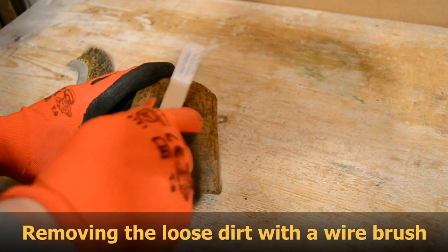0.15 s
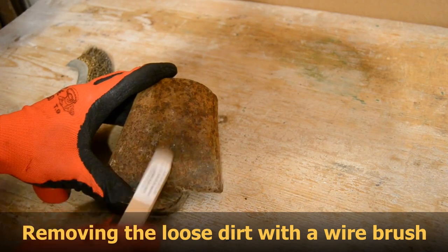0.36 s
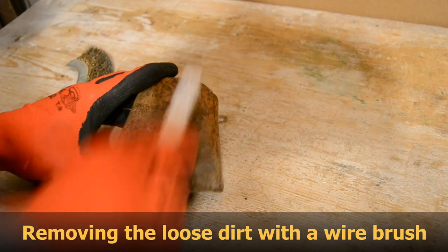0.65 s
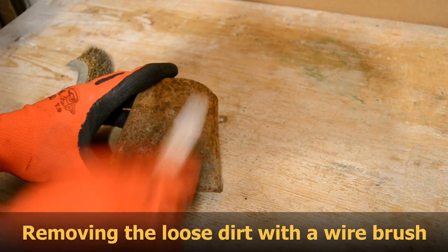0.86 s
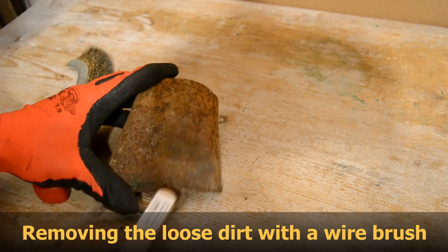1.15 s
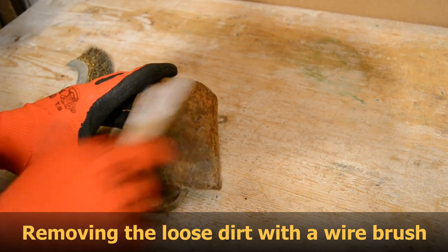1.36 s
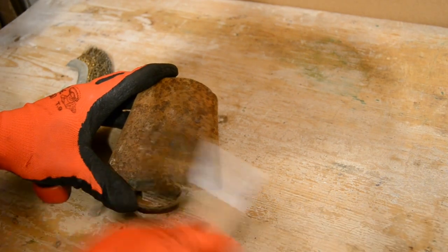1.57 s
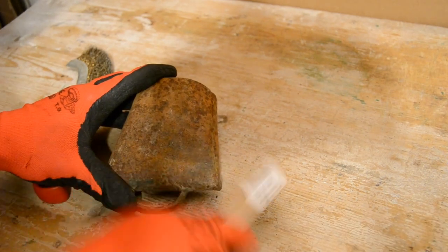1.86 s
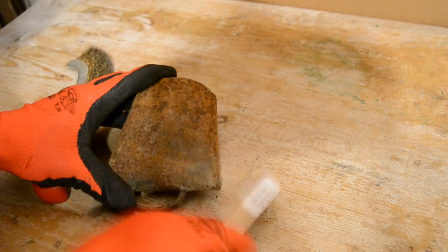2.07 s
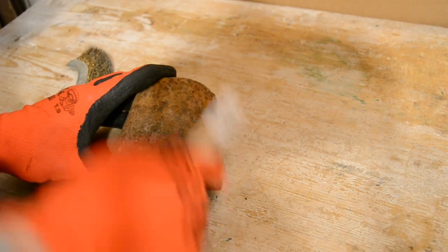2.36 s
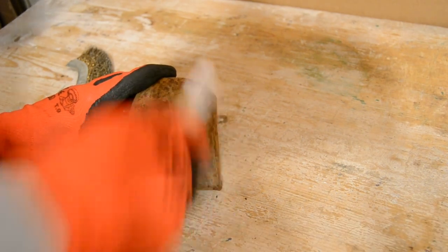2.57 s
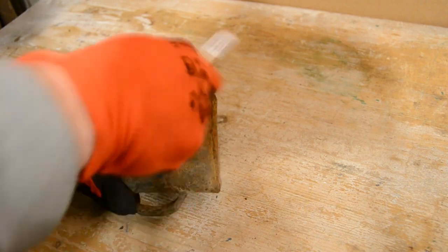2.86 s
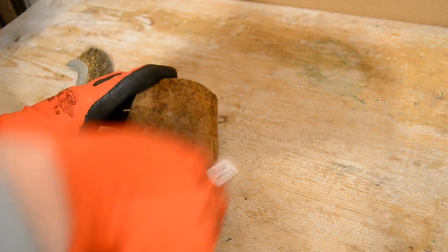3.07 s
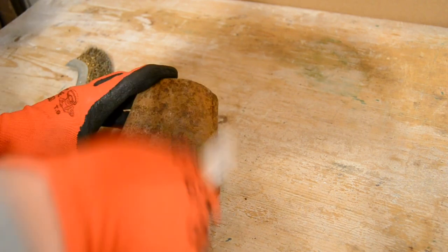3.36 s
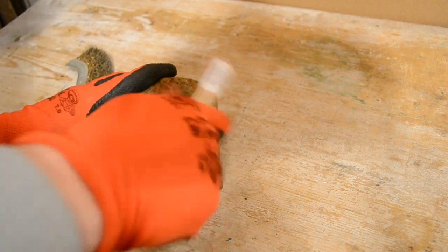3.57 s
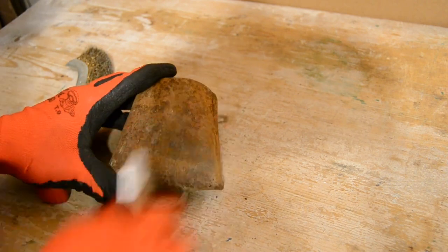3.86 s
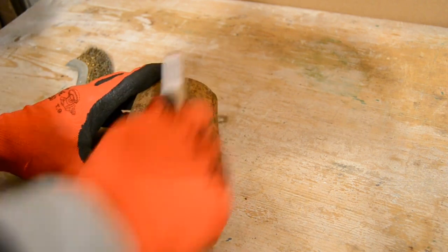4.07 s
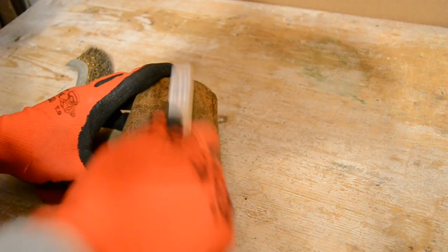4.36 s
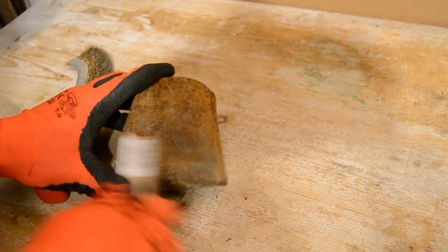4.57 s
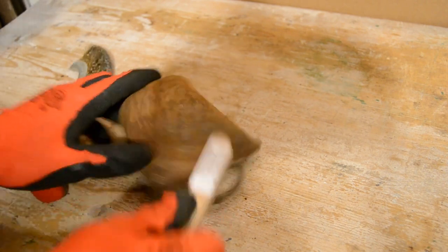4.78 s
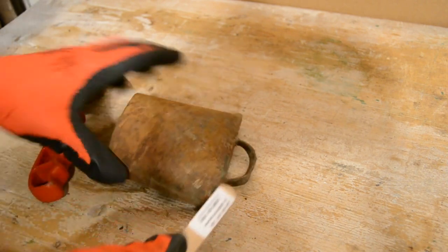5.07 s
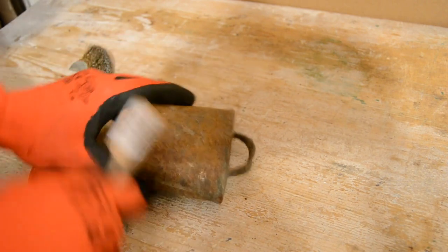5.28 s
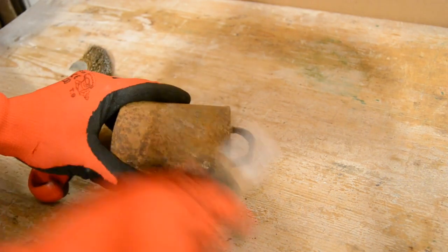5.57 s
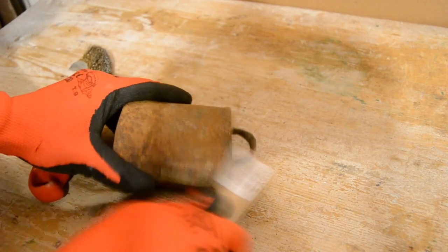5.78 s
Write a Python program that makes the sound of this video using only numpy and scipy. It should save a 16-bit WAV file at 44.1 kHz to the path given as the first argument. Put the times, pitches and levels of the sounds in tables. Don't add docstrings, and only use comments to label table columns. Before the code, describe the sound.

Coarse bristles strike and drag across damped sheet metal, bright and scratchy over a boxy hollow knock and faint wooden bench thuds. Four spaced strokes lead to quicker, lighter ones, then heavier regular scrapes. After a pause for handling and bumping the bell on the bench, brushing resumes with two bright rasps. Short dull room tail, soft steady hiss and hum, close single microphone, centred.

```python
import sys
import numpy as np
from scipy import signal
from scipy.fft import rfft, irfft
from scipy.io import wavfile
from scipy.ndimage import uniform_filter1d

SR = 44100
rng = np.random.default_rng(int(sys.argv[2]) if len(sys.argv) > 2 else 0)


def attenuation_scalar(level_db):
    decades = np.asarray(level_db, float) / 20
    return 10 ** decades


def dump_mix(stems):
    frames = np.atleast_2d(stems).T
    limited = np.clip(frames, -1, 1)
    pcm = np.round(limited * 32767).astype(np.int16)
    wavfile.write(sys.argv[1], SR, pcm)


N = 261513
STEP = 32

# start_s, low_wall_db, high_wall_db, hollow_db, bench_db
LANDINGS = [(0.243, -30.5, -25, -25, -35.5), (0.658, -21, -23, -12.5, -32),
            (1.033, -23.5, -24.5, -23.5, -34.5), (1.418, -32.5, -22, -24, -39.5),
            (1.518, -27, -35, -41, -57), (1.787, -26, -32.5, -47, -42), (2.031, -30.5, -29, -32.5, -40),
            (2.244, -29.5, -28, -33, -37.5), (2.57, -16.5, -24.5, -20, -33),
            (2.944, -18, -23.5, -20.5, -33), (3.287, -23.5, -23.5, -19.5, -36),
            (3.665, -34, -35.5, -42, -41), (3.715, -30.5, -47, -49, -46),
            (4.098, -21.5, -21.5, -31.5, -39.5), (4.472, -28, -29, -18.5, -29),
            (5.442, -16.5, -20, -15.5, -29), (5.729, -22.5, -30.5, -17.5, -29.5)]


def unit(x):
    return x / np.sqrt(np.mean(x ** 2))


def colour(x, points):
    hz, db = np.transpose(points)
    grid = np.linspace(1, SR / 2, 2049)
    log_gain = np.interp(np.log(grid), np.log(hz), db) * np.log(10) / 20
    cepstrum = irfft(log_gain)
    cepstrum[1:2048] *= 2
    cepstrum[2049:] = 0
    impulse = irfft(np.exp(rfft(cepstrum)))[:2048]
    return signal.fftconvolve(x, impulse)[:N]


def shade(x, points):
    return colour(x, points) / np.std(colour(rng.standard_normal(N), points))


def walk(rate):
    hold = int(SR / rate)
    levels = np.repeat(rng.standard_normal(N // 200), hold)[:N]
    return 1.2 * uniform_filter1d(levels, hold)


def ring(force, modes, wander_db, rate, tilt_db=0):
    out, power = 0, 0
    turned = np.arange(N) > 4.68 * SR
    centre_hz = np.mean(modes, axis=0)[0]
    for k, (hz, width, db, turned_db) in enumerate(modes):
        r = np.exp(-np.pi * width / SR)
        held_db = np.where(turned, turned_db, db)
        drive = force * attenuation_scalar(held_db + tilt_db * np.log2(hz / centre_hz) + wander_db * walk(rate))
        poles = [1, -2 * r * np.cos(2 * np.pi * hz / SR), r * r]
        sign = (-1) ** k
        out = out + sign * (1 - r * r) / 2 * signal.lfilter([1, 0, -1], poles, drive)
        power += attenuation_scalar(db) ** 2 * np.pi * width / SR
    return out / np.sqrt(power)


def shop():
    # pitch_hz, level_db per Hz
    idle = [(25, -12.5), (60, -11), (100, -4), (150, -1.5), (300, -3.5), (700, -5), (1300, -8),
            (2000, -9.5), (3200, -13), (5000, -19.5), (8000, -23.5), (11000, -26.5)]
    return attenuation_scalar(-60.5 + 1.4 * walk(1.7)) * unit(colour(rng.standard_normal(N), idle))


def slips(per_s, spread_db, patchy_db):
    when = rng.random(N) < per_s / SR
    size = np.minimum(rng.exponential(size=N), 4.)
    sign = rng.standard_normal(N)
    return unit(when * sign * attenuation_scalar(spread_db * size + patchy_db * walk(60)))


def swell(start, top, lift, db, rule):
    over_db, rise, sag, release = rule
    top_db = db + over_db
    end_db = top_db - sag * (lift - top)
    times = [start, top, lift, lift + 80 / release]
    levels = [top_db - rise * (top - start), top_db, end_db, end_db - 80]
    return attenuation_scalar(np.interp(np.arange(0, N, STEP) / SR, times, levels, left=-200, right=-200))


def touches(rows, rules):
    total = 0
    for start, top, lift, rustle, weight in rows:
        drives = [rustle] * 3 + [weight] * 2
        total = total + np.array([swell(start, top, lift, db, rule)
                                  for db, rule in zip(drives, rules.values())])
    return total


def knocks():
    # start_s, low_wall_db, high_wall_db
    snag_rows = [(1.177, -23, -47), (1.328, -40.5, -46.5), (1.904, -38, -44.5), (3.624, -52, -59),
                 (3.637, -40.5, -49), (3.903, -27, -44), (4.697, -66, -45), (4.707, -48, -40),
                 (4.733, -34.5, -33.5), (5.135, -56, -56), (5.368, -44.5, -45), (5.419, -48, -40)]
    # start_s, wall_db, hollow_db, bench_db
    bump_rows = [(.05, -61, -59, -51.5), (1.862, -38, -34.5, -47), (2.089, -43, -29.5, -44.5),
                 (2.3, -50, -32.5, -52), (3.03, -37, -32, -44), (3.394, -52, -38, -36.5),
                 (4.759, -32.5, -11.5, -36.5), (4.779, -56, -20.5, -51), (4.799, -58, -46, -64),
                 (4.844, -62, -40, -45), (4.864, -40, -43, -73), (4.944, -76, -32.5, -42),
                 (4.969, -32, -44, -74), (5.029, -44, -55, -61), (5.065, -45, -51, -62),
                 (5.298, -42, -43.5, -60), (5.328, -76, -68, -73)]
    snags = [(s, low, high, low - 18.5, low - 29) for s, low, high in snag_rows]
    bumps = [(s, wall, wall - 15, hollow, bench) for s, wall, hollow, bench in bump_rows]
    return np.vstack([LANDINGS, snags, bumps]).T


def blows(db, rise_s, fall_s):
    t = np.arange(int(.06 * SR)) / SR
    spikes = np.zeros(N)
    spikes[(knocks()[0] * SR).astype(int)] = attenuation_scalar(db)
    return signal.fftconvolve(spikes, (1 - np.exp(-t / rise_s)) * np.exp(-t / fall_s))[:N]


def pressure():
    # start_s, loudest_s, until_s, rustle_db, weight_db
    handling = [(0, -0.01, 0.026, -47, -49.5), (0.036, .062, 0.25, -54, -55),
                (2.47, 2.497, 2.46, -54.5, -74), (1.94, 1.96, 1.94, -64, -51), (2.15, 2.17, 2.3, -69, -60),
                (2.34, 2.36, 2.41, -71, -53.5), (4.67, 4.715, 4.83, -44, -43),
                (4.73, 4.736, 4.752, -42, -38.5), (4.769, 4.77, 4.71, -46, -29),
                (4.842, 4.855, 4.88, -54.5, -43.5), (4.89, 4.9, 4.93, -60, -56),
                (4.94, 4.955, 4.96, -48, -42), (4.994, 5.03, 5.09, -55.5, -52), (5.1, 5.14, 5.1, -66, -51),
                (5.22, 5.25, 5.32, -53, -51.5), (5.365, 5.375, 5.43, -54, -52)]
    # over_db, rise_db_per_s, sag_db_per_s, release_db_per_s
    touch_rules = dict(low=(0, 300, 74, 500.5), high=(-9, 300, 87, 500), back=(-0.5, 302, 45, 493),
                   hollow=(3, 198, 62, 503.5), bench=(-8, 200, 44, 407))
    # fastest_s, lift_s, drag_db, brightness_db, weight_db
    strokes = [(0.353, 0.432, -37, 7.5, -36), (0.749, 0.82, -34.5, 3, -36.5), (1.13, 1.209, -35, 7, -31),
               (1.429, 1.493, -38, 6, -33.5), (1.583, 1.612, -35.5, 2.5, -41.5),
               (1.842, 1.848, -34, 4, -39.5), (2.07, 2.077, -38, 3, -40.5), (2.26, 2.292, -37, 1, -35.5),
               (2.632, 2.723, -36.5, 3.5, -31.5), (2.999, 3.097, -36, 3, -34.5),
               (3.363, 3.445, -36, 2, -33.5), (3.68, 3.708, -47.5, 0, -48), (3.833, 3.879, -35, 6, -36.5),
               (4.221, 4.27, -33, 3, -34), (4.557, 4.62, -34.5, 2.5, -34.5), (5.51, 5.544, -36, 8, -34),
               (5.804, 5.818, -36, 7, -34)]
    # over_db, rise_db_per_s, sag_db_per_s, release_db_per_s
    drag_rules = dict(low=(-0.5, 42, 48, 421), high=(0, 93, 50.5, 534), back=(-8.5, -28.5, 56.5, 392),
                  hollow=(0.5, -38, 92, 332), bench=(-10.5, -39.5, 38, 249))
    back_levels = [0, -1, -0.5, 4, -4.5, -4, 0, 1.5, 2.5, 3, 3, -3, -1, -2, 0.5, 1, 1]
    # start_s, loudest_s, until_s, rake_db, weight_db
    rim_rakes = [
        (1.505, 1.522, 1.576, -45, -69),
        (3.207, 3.211, 3.07, -49.5, -66.5),
        (3.622, 3.638, 3.63, -44.5, -42),
        (3.89, 3.915, 3.922, -33.5, -41.5),
        (4.27, 4.295, 4.305, -34, -51),
    ]
    # over_db, rise_db_per_s, sag_db_per_s, release_db_per_s
    raking_rules = dict(low=(-11, 300, 90, 1100), high=(-10.5, 300, 91, 1100), back=(-0.5, 303, 51, 1102.5),
                    hollow=(0, 300, 60, 900), bench=(-20, 200, 62, 500))

    drags = touches(handling, touch_rules)
    rim = touches(rim_rakes, raking_rules)
    for landing, stroke, back in zip(LANDINGS, strokes, back_levels):
        start = landing[0] + 0.0075
        top, lift, drag, bright, weight = stroke
        drives = drag, drag + bright, drag + back, weight, weight
        drags = drags + np.array([swell(start, top, lift, db, rule)
                                  for db, rule in zip(drives, drag_rules.values())])
    wood = attenuation_scalar(np.array([[0], [0], [-7], [0], [0]]))
    raking = drags[2] + attenuation_scalar(2) * rim[2]
    out = np.repeat(np.vstack([drags + wood * rim, raking]), STEP, axis=1)[:, :N]
    out[4] += blows(knocks()[4] + 11, .002, 0.0091)
    return uniform_filter1d(out, int(.006 * SR), axis=1)


def reach():
    # low_wall_db, high_wall_db, hollow_db, all per octave
    tilts = [(-7.5, -1.5, -1), (4.5, 1.5, 3), (-12, -4, 0), (11.5, -9, 2.5), (3.5, 3.5, -2), (0, 3, -1),
             (27, 5, 13), (8, 8.5, -6.5), (-2.5, 5, -3), (0, -1.5, 0), (5.5, 1, -3.5), (-1, -10, -12),
             (-5, -4, -1), (-5.5, -6, 1.3), (-5, -1, 0.5), (-8, 1, 1.5), (1.5, -3, -0.5)]
    stroke = np.searchsorted(np.array(LANDINGS)[1:, 0] * SR, np.arange(N))
    return np.transpose(tilts)[:, stroke]


def bell_wall(low_force, high_force, low_tilt, high_tilt):
    # pitch_hz, width_hz, level_db as first held, turned_db after the turn
    low_modes = [(2856, 48, -6.5, -5), (3180, 46, 0, -9), (3380, 23, -1.5, -20), (3442, 15, -3, -1),
                 (3564, 109, -3.5, -9.5), (4235, 36, -3, -11.5), (4376, 67, 3.5, 0), (4750, 28, -5.5, -17),
                 (4676, 113, -2.5, 2.5)]
    # pitch_hz, width_hz, level_db as first held, turned_db after the turn
    high_modes = [(5410, 215, -0.5, -10), (5630, 43, -5.5, -21), (6010, 240, -7.5, -10.5),
                  (6690, 170, 1, 1.5), (6580, 45, -3.5, -16.5), (7050, 60, 3.5, 2.5), (7400, 120, -3, -17),
                  (8270, 78, 1.5, 1), (9360, 270, -9, -44.5), (9060, 80, 5.5, 4.5), (9810, 52, 1, -3),
                  (10040, 82, -7.5, 2.5), (10290, 99, -3.5, -15)]
    return ring(low_force, low_modes, 3.8, 14, low_tilt) + ring(high_force, high_modes, 3.8, 14, high_tilt)


def bare_ticks(force):
    # pitch_hz, level_db per Hz
    tick = [(2300, -22.5), (2900, 0.5), (3800, -1), (5000, 1.5), (7000, -1.5), (7850, -1), (9000, 1.5),
            (10300, -8.5), (11000, -2)]
    return shade(force, tick)


def brush_back(force):
    # pitch_hz, width_hz, level_db as first held, turned_db after the turn
    modes = [(1296, 92, -7, -6), (1521, 40, 3, 3.5), (2402, 39, 1.5, -3.5)]
    return ring(force, modes, 3.4, 6.2)


def raking_wires(force):
    # pitch_hz, level_db per Hz
    rake = [(700, -28.5), (1200, 0.5), (1700, 2), (2300, 1), (3000, -0.5), (4500, -37)]
    return shade(force, rake)


def bell_hollow(force, tilt):
    # pitch_hz, width_hz, level_db as first held, turned_db after the turn
    modes = [(451, 38, -7, -1), (528, 61, -5, -3), (565, 20, 1, 3), (713.3, 44, 7.5, 2.5),
             (764, 163, 5, -0.5), (865.6, 114, 6, -1.5), (1035, 210, -9, -8)]
    return ring(force, modes, 2.4, 12, tilt)


def workbench(force):
    # pitch_hz, width_hz, level_db as first held, turned_db after the turn
    modes = [(139.8, 15.9, 2, 1.5), (222, 17.7, -5.5, -0.5), (305, 51, -4, 1.5), (410.5, 16.6, -3, -19)]
    return ring(force, modes, 1.3, 4.0)


def brush():
    low, high, back, hollow, bench, raking = pressure()
    _, low_db, high_db, hollow_db, bench_db = knocks()
    low_tilt, high_tilt, hollow_tilt = reach()
    tips = slips(10000, 1.8, .6)
    tufts = rng.standard_normal(N)
    low_blow = tufts * blows(low_db + 1.5, .0004, 0.0037)
    high_blow = tufts * blows(high_db + 2, .0004, 0.0056)
    back_blow = tufts * blows(hollow_db / 2 + low_db / 2 + 1.5, 0.00093, 0.0029)

    grip = low / (low + attenuation_scalar(-48))
    firm = uniform_filter1d(abs(low_blow), size=128)
    firm = firm / (firm + attenuation_scalar(-46))
    gripped = tips * grip
    wall = bell_wall(gripped * low + low_blow * firm, gripped * high + high_blow * firm, low_tilt, high_tilt)
    rustle = 2.0 * unit(tips * abs(tips)) * (1 - grip)
    ticks = bare_ticks((low + high) * (gripped + rustle) + low_blow + high_blow)
    wood = brush_back(gripped * back + back_blow)
    rake = raking_wires(tips * raking)

    jolts = slips(2000, 1.8, 1.0)
    cavity = bell_hollow(jolts * hollow + blows(hollow_db + 20.5, .00005, .0001), hollow_tilt)
    table = workbench(jolts * bench + blows(bench_db + 11, 0.00043, 0.00063))
    return attenuation_scalar(2.5) * wall + attenuation_scalar(-6.5) * ticks + attenuation_scalar(-2.0) * wood + attenuation_scalar(-1.0) * rake + cavity + table


def rocking():
    # start_s, hollow_db, rim_db
    rocks = [
        (1.65, -45, -39),
        (1.714, -40, -52),
        (1.989, -46, -61),
        (2.202, -51, -56),
        (2.229, -43, -40.5),
        (2.421, -46.5, -59),
        (2.449, -39, -43.5),
        (2.797, -46, -55.5),
        (2.821, -37, -44.5),
    ]
    # pitch_hz, width_hz, level_db as first held, turned_db after the turn
    hollow_modes = [(682, 51, 1, -2), (826, 92, 1, 0)]
    # pitch_hz, width_hz, level_db as first held, turned_db after the turn
    rim_modes = [(2680, 25, -10, -5), (3198, 27, -0.5, 0), (3248, 55, -1, -2), (4300, 72, -15.5, -10)]
    s, hollow_db, rim_db = np.transpose(rocks)
    at = (s * SR).astype(int)
    hollow, rim = np.zeros((2, N))
    hollow[at] = attenuation_scalar(hollow_db)
    rim[at] = attenuation_scalar(rim_db)
    return attenuation_scalar(22) * ring(hollow, hollow_modes, 1, 9.42) + attenuation_scalar(22.0) * ring(rim, rim_modes, 1, 4.7)


def echo(x):
    t60_s = 0.18
    t = np.arange(int(.5 * SR)) / SR
    tail = rng.standard_normal(len(t)) * attenuation_scalar(-60 * t / t60_s) * (t > .004)
    wet = signal.fftconvolve(x, tail / np.sqrt(np.sum(tail ** 2)))[:N]
    return attenuation_scalar(-10.5) * colour(wet, [(100, 8.0), (2000, -0.5), (10000, -8.0)])


def scene():
    near = brush() + rocking()
    mono = near + echo(near) + shop()
    return np.array([mono, mono])


def noise_fill(mid):
    # pitch_hz, share of tiles filled
    fill_share = [(3900, 0), (4100, .05), (10200, .05), (10400, .35), (11400, .35), (13500, .3)]
    hz, s, tiles = signal.stft(mid, SR, nperseg=2048)
    band = (hz // 690).astype(int)
    pair = np.arange(len(s)) // 2
    active = (s > 1.3) & (s < 4.75)
    share = np.interp(hz, *np.transpose(fill_share), left=0, right=0)[:, None] * active
    filled = rng.random((band[-1] + 1, pair[-1] + 1))[band][:, pair] < share
    turn = np.exp(2j * np.pi * rng.random(tiles.shape))
    fill = signal.istft(tiles * filled * turn, SR, nperseg=2048)[1][:N]
    fast, slow = (uniform_filter1d(abs(mid), size=k) for k in (128, 2048))
    return attenuation_scalar(-8) * fill * np.minimum(fast / slow, 1) ** 2


def low_pass(x):
    return signal.sosfilt(signal.butter(12, 13700, fs=SR, output="sos"), x)


def record(dry):
    # pitch_hz, level_db
    tone = [(20, -31.5), (50, -12.5), (104, -17), (120, 0.5), (140, -5.5), (10200, -2.5), (11300, -10),
            (11500, -21), (12000, -38.5), (14000, -68)]
    # pitch_hz, level_db
    mirror_gain = [(11800, -95), (12200, -43.5), (12700, -34), (13300, -46), (13900, -74.5)]
    flipped = dry[0] * (-1.) ** np.arange(N)
    mid = colour(dry[0], tone) + colour(flipped, mirror_gain)
    side = noise_fill(mid)
    return low_pass(np.array([mid + side, mid - side]))


dry = scene()
out = record(dry)
dump_mix(out)
```